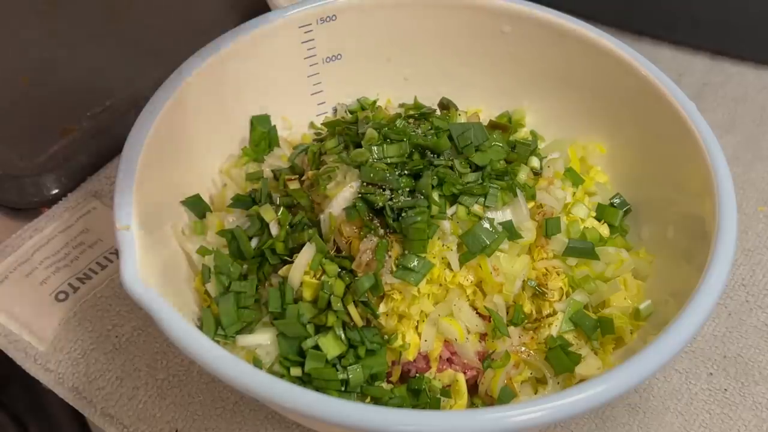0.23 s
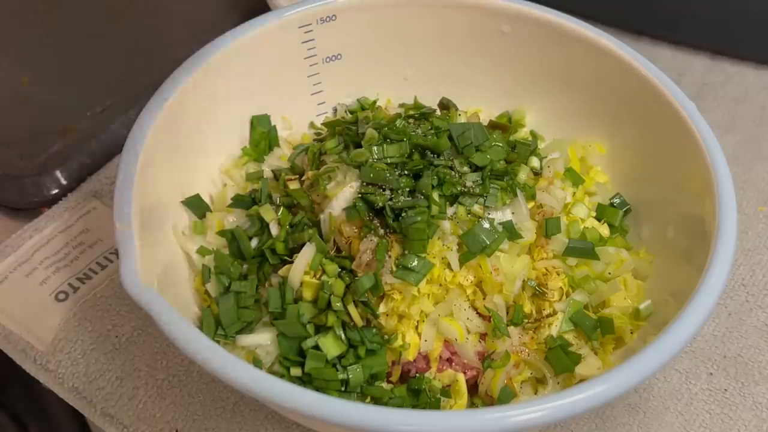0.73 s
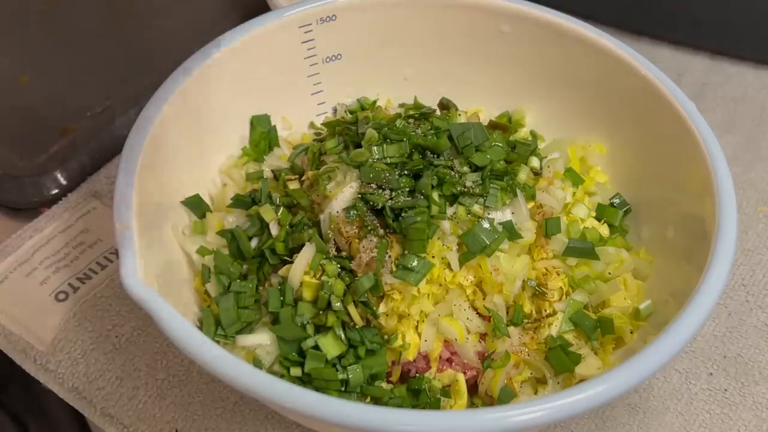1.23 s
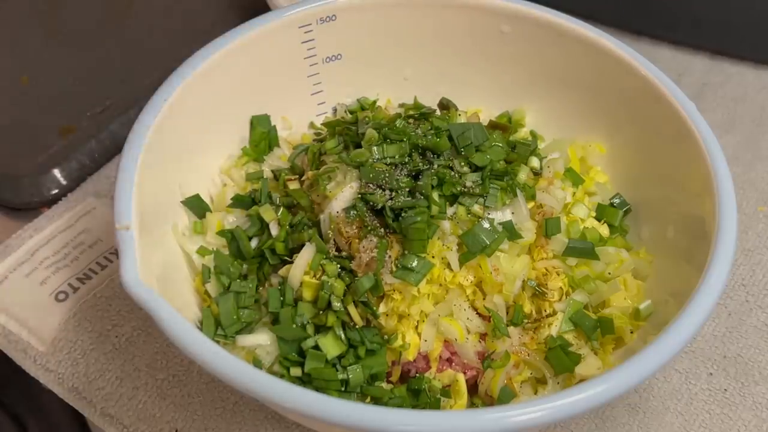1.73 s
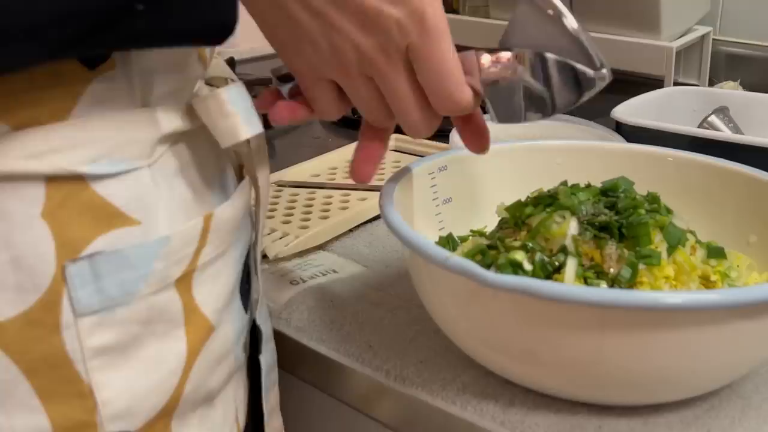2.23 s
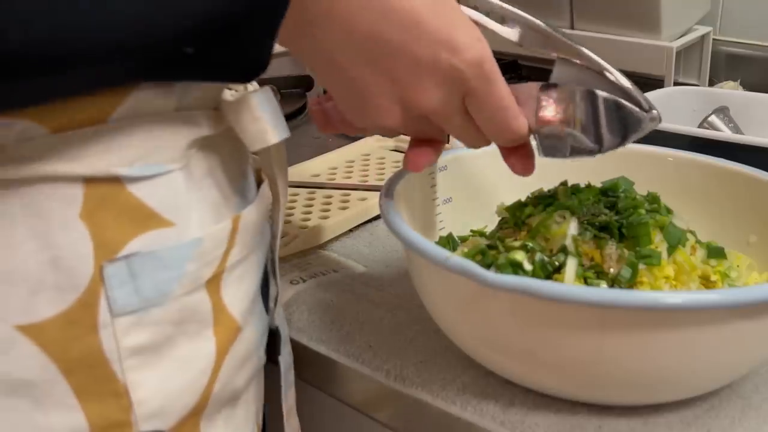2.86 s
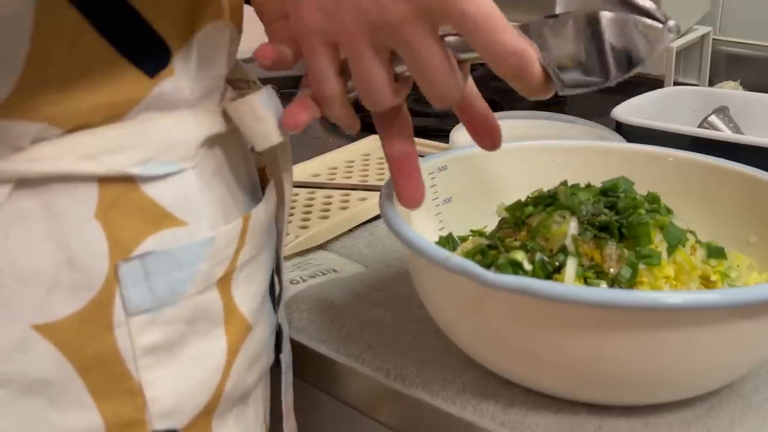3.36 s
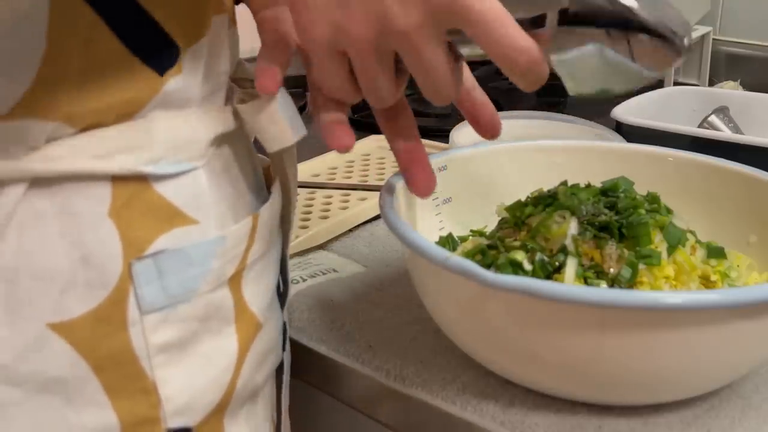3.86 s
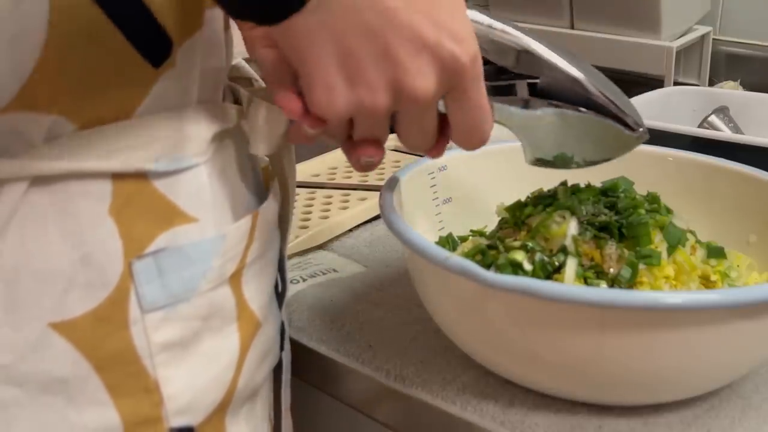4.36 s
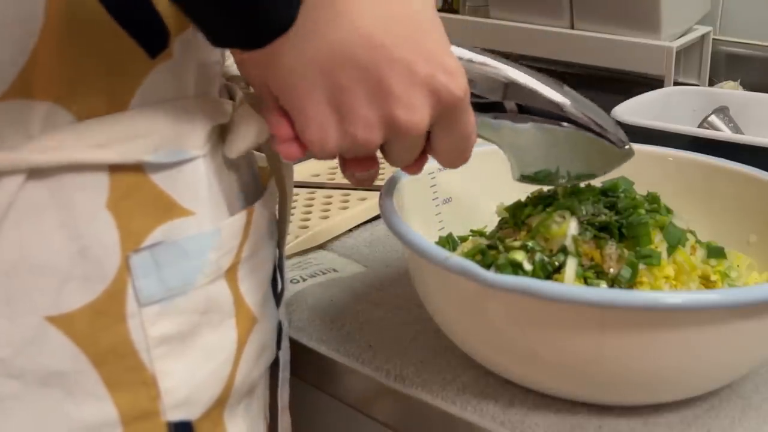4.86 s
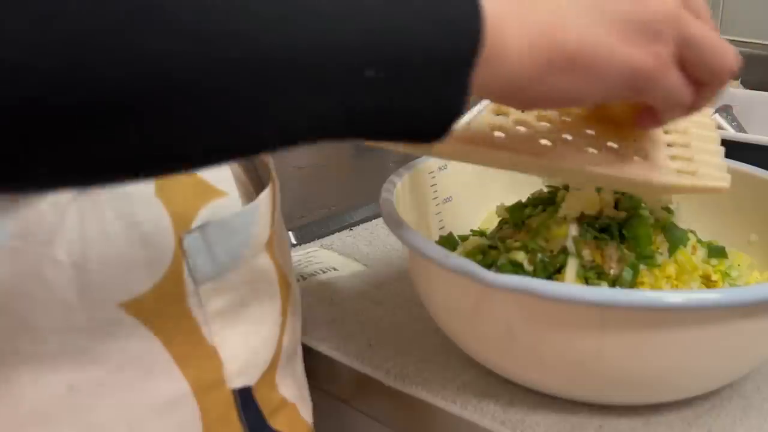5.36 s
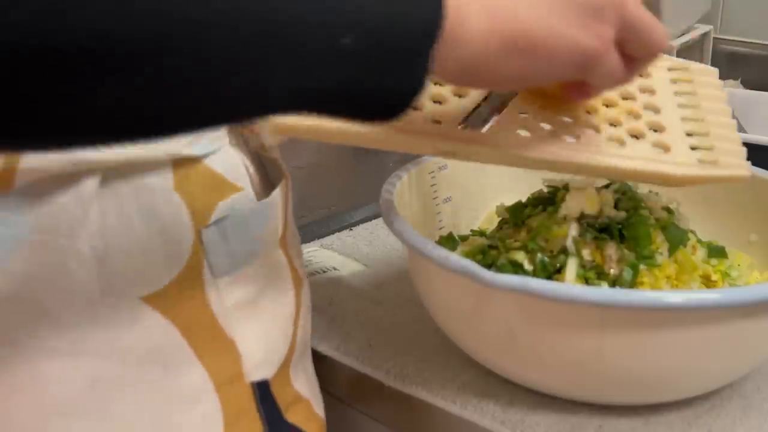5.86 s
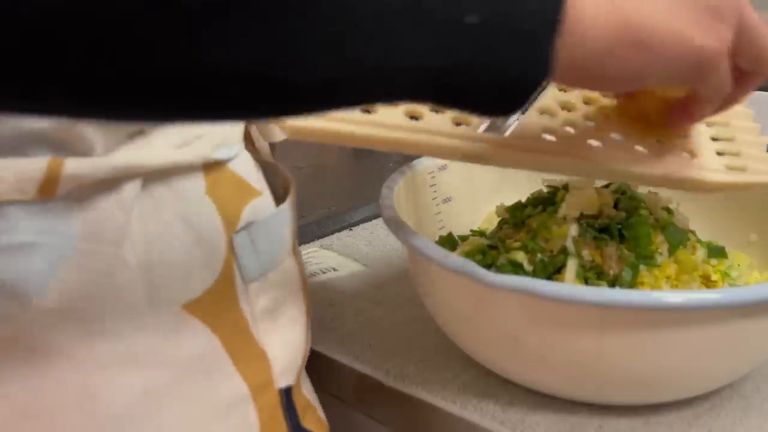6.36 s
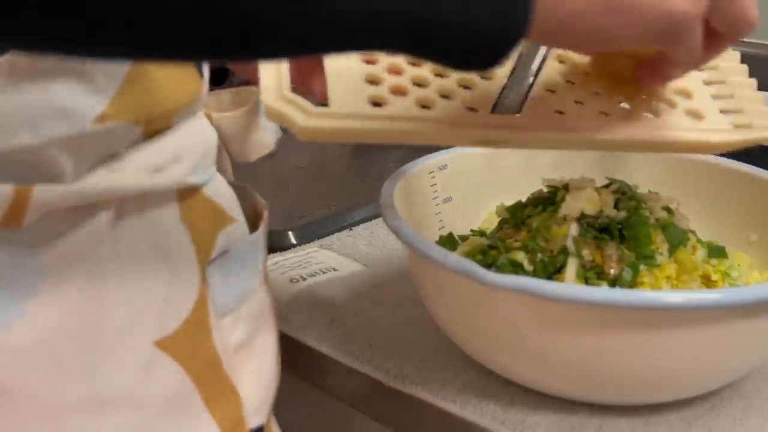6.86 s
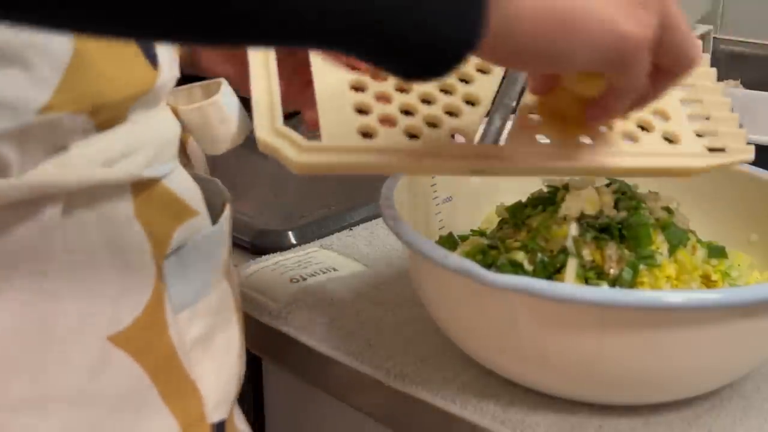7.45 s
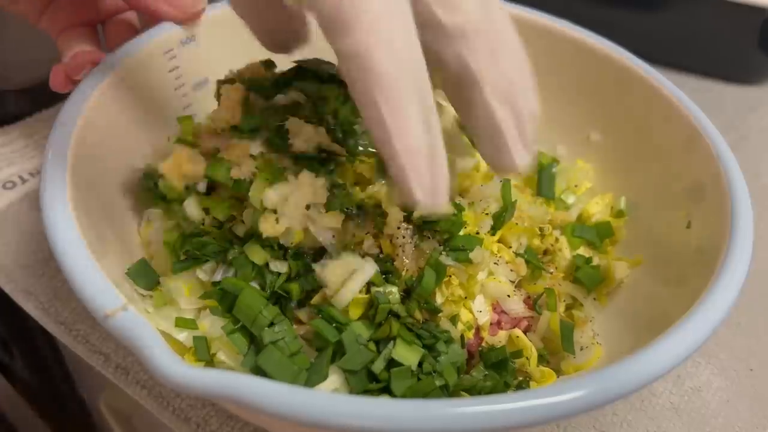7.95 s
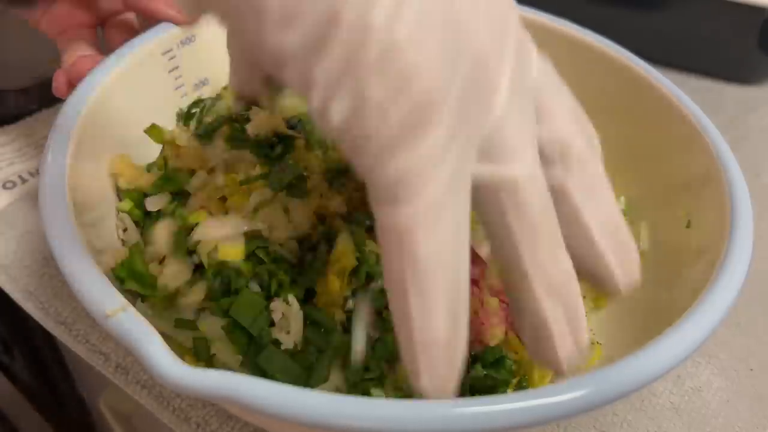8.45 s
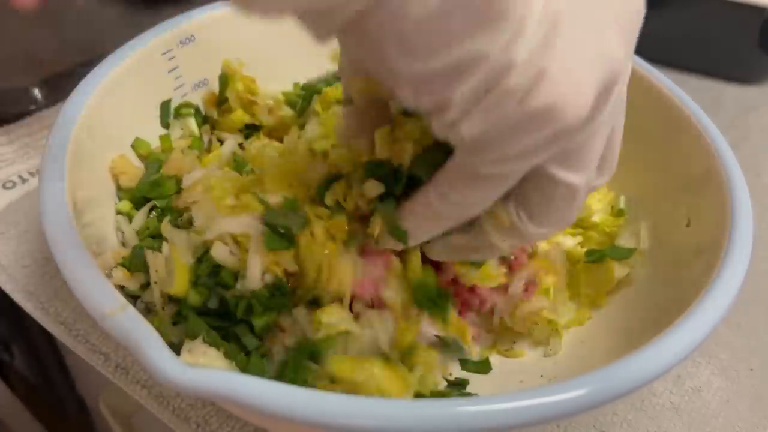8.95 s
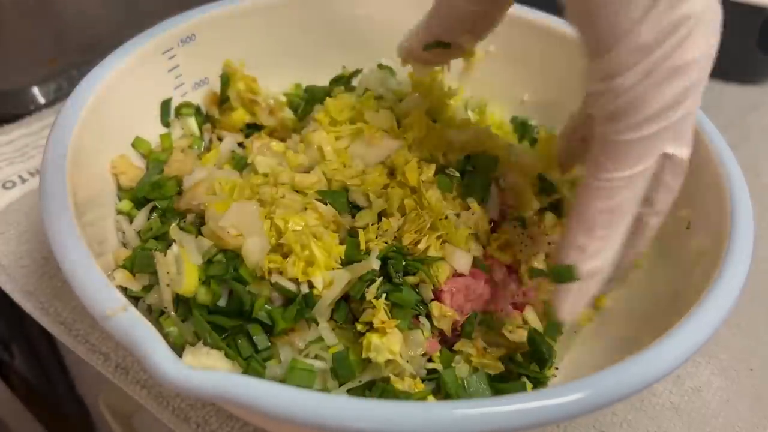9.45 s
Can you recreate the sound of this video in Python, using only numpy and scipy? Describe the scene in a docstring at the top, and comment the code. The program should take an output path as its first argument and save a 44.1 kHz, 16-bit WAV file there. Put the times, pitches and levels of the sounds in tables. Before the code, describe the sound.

Close up in a humming kitchen, a pepper mill crunches five times, a metal press squeezes juicily and snaps, ginger rasps on a grater, and gloved hands squelch.

```python
"""Close to a mixing bowl, a kitchen hums throughout: coloured noise plus narrow-band drone and whines.
First a pepper mill is twisted five times (grain noise, ringing ticks) and a sleeve rustles (soft grains);
then a steel garlic press is squeezed twice and snaps shut (grains driving resonators, struck modes).
Next ginger is rubbed to and fro on a plastic grater (grains under stroke envelopes), and a gloved hand
kneads wet filling (grains, chirps, pops). Dull worktop thuds (noise through modes) fall from the press on."""
import sys
import numpy as np
from scipy import signal
from scipy.fft import rfft, irfft, next_fast_len
from scipy.io import wavfile
from scipy.ndimage import uniform_filter1d

SR = 44100
rng = np.random.default_rng(int(sys.argv[2]) if len(sys.argv) > 2 else 0)


def file_out(sig):
    """Save sig as 16-bit WAV at sys.argv[1]."""
    # one column per channel
    cols = np.atleast_2d(sig).T
    # limit, then scale
    lim = np.clip(cols, -1, 1)
    pcm = np.round(lim * 32767).astype(np.int16)
    wavfile.write(sys.argv[1], SR, pcm)


N = 427769

# Kneading grip. Each row: time in seconds, relative glove level in dB, wet level over the glove in dB.
KNEADING = [(7.68, -71, 5), (7.7, -53.5, 3.5), (7.79, -50, -8), (7.85, -57.5, 1), (7.89, -66, 9.5),
            (8.06, -69.5, 15.5), (8.14, -44, -2), (8.15, -56.5, -1), (8.2, -48, 0.5), (8.35, -67, 5.5),
            (8.4, -77, 18), (8.51, -71, -1), (8.53, -57, 4.5), (8.84, -44.5, -3), (8.86, -53, -2),
            (8.99, -67, 7), (9.0, -61, -1), (9.02, -70.5, 8.5), (9.24, -61.5, 5.5), (9.36, -56, -33),
            (9.48, -52, -2), (9.56, -61.5, 2), (9.7, -68.5, 10.5)]
# Spectrum of dragged cloth and of scuffs. Each row: frequency in Hz, relative density in dB per Hz.
CLOTH = [(300, -0.5), (700, 0), (1200, 0.5), (2500, 2.5), (4500, -6), (8000, -8.5), (16000, -24)]


def undb(db):
    """Convert dB to gain."""
    return np.exp(np.asarray(db) * (np.log(10) / 20))


def level(x, db):
    """Scale to the given rms level in dB."""
    return x * undb(db) / np.sqrt(np.mean(x ** 2))


def curve(table, column):
    """Gain interpolated in dB from a table column, silent outside its times."""
    rows = np.array(table)
    return undb(np.interp(np.arange(N) / SR, rows[:, 0], rows[:, column], left=-200, right=-200))


def colour(x, spectrum, size=2048):
    """Minimum-phase filter with the given spectrum, from the folded cepstrum of its log gain."""
    hz, db = np.transpose(spectrum)
    bin_hz = np.maximum(np.arange(size // 2 + 1) * SR / size, 1)
    log_gain = np.interp(np.log(bin_hz), np.log(hz), db) * np.log(10) / 20
    cepstrum = irfft(log_gain)
    cepstrum[1:size // 2] *= 2
    cepstrum[size // 2 + 1:] = 0
    impulse = irfft(np.exp(rfft(cepstrum)))
    return signal.oaconvolve(x, impulse)[:N]


def ring(modes):
    """Impulse response of decaying modes, neighbours in opposite phase, peak 1."""
    t = np.arange(SR // 2) / SR
    h = np.zeros(len(t))
    for k, (hz, db, t60_s) in enumerate(modes):
        h += (-1) ** k * undb(db - 60 * t / t60_s) * np.sin(2 * np.pi * hz * t)
    return h / np.abs(h).max()


def walk(rate_hz):
    """Random levels drawn at the given rate, joined by straight lines; spread just under 1."""
    hold = int(SR / rate_hz)
    steps = np.repeat(rng.standard_normal(N // hold + 1), hold)
    return uniform_filter1d(steps, hold)[:N]


def grains(per_s, spread_db, smear_s, rub, patchy_db):
    """Tiny breakages, dB sizes exponentially spread and capped, each a noise burst, over a steady rub."""
    chance = rng.random(N) * SR / per_s
    hit_power = np.where(chance < 1, np.maximum(chance, .04) ** (-spread_db / 4.3), 0)
    burst = np.sqrt(signal.lfilter([1], [1, -np.exp(-1 / (smear_s * SR))], hit_power))
    noise = rng.standard_normal((2, N))
    mixed = level(burst * noise[0], 0) + rub * noise[1]
    return mixed * undb(patchy_db * walk(60))


def shimmer(x, modes, wander_db, rate_hz):
    """Drive each mode with a strength that wanders as the contact point moves; rms 1."""
    out = 0
    for k, (hz, db, t60_s) in enumerate(modes):
        radius = undb(-60 / (t60_s * SR))
        poles = [1, -2 * radius * np.cos(2 * np.pi * hz / SR), radius * radius]
        drive = x * undb(wander_db * walk(rate_hz))
        out = out + (-1) ** k * undb(db) * signal.lfilter([1, 0, -1], poles, drive)
    return level(out, 0)


def add(out, start_s, sound):
    """Mix a sound in at its start time."""
    i = int(start_s * SR)
    out[i:i + len(sound)] += sound[:N - i]


def ticks(table, t60_s, width, ping_db):
    """Sharp cracks: a damped noise burst with no bass, and a brief ping at its pitch."""
    out, t = np.zeros(N), np.arange(SR // 30) / SR
    for (start_s, db, hz), noise in zip(table, rng.standard_normal((len(table), len(t)))):
        burst = np.sign(noise) * undb(-60 * t / t60_s)
        crack = signal.lfilter(*signal.iirpeak(hz, 1 / width, SR), burst)
        # the ping falls 60 dB in 55 cycles
        ping = undb(ping_db - 60 * t * hz / 55) * np.sin(2 * np.pi * hz * t)
        both = crack / np.abs(crack).max() + ping
        bass_cut = signal.butter(2, 0.59 * hz, "highpass", fs=SR)
        add(out, start_s, undb(db) * signal.lfilter(*bass_cut, both))
    return out


def place(x, sides):
    """Two channels that differ in level and phase by frequency, as two microphones hear a source."""
    hz, db, lead_rad = np.transpose(sides)
    size = next_fast_len(N)
    f = np.arange(size // 2 + 1) * SR / size
    half = undb(np.interp(f, hz, db) / 2) * np.exp(.5j * np.interp(f, hz, lead_rad))
    return irfft(rfft(x, size) * np.array([half, 1 / half]), size)[:, :N]


def kitchen():
    """Broad appliance noise, quieter at first, with low drone and thin whines; bass alike left and right."""
    # Appliance noise spectrum. Each row: frequency in Hz, relative density in dB per Hz.
    air_spectrum = [(15, -52.5), (25, -24), (49, -1.5), (70, -2.5), (200, -17.5), (373, -23.5),
                    (476, -31.5), (545, -30.5), (695, -36.5), (1400, -44), (2840, -41), (3160, -42),
                    (3920, -47.5), (7710, -51.5), (16000, -68)]
    # Each row: time in seconds, air noise gain in dB, whine gain in dB.
    air_swell = [(0, -4.5, -16), (2.19, -2, -4), (2.21, -1.5, -1.5), (6.3, .6, 1.5), (7.5, 2, -2),
                 (9.7, 1, -7)]
    # Appliance drone swell. Each row: time in seconds, drone gain in dB.
    drone_swell = [(0, 0), (2.2, 0.5), (3.5, -1), (6.8, 0), (7.3, 4.5), (7.7, -2.5), (8.7, 3), (9.7, 0.5)]
    # Low drone bands. Each row: frequency in Hz, width in Hz, level before the swell in dB.
    drone_lines = [(41, 6.1, -58.5), (67, 3.2, -51.5), (96.1, 11, -53)]
    # Whine bands. Each row: frequency in Hz, width in Hz, level before the swell in dB.
    whine_lines = [(255.4, 11, -69.5), (372.2, 10, -64.5), (2147, 80, -72), (1883, 53, -77)]
    mid, side = (colour(rng.standard_normal(N), air_spectrum, size=8192) for _ in range(2))
    side_band = signal.butter(1, [350, 1800], "bandpass", fs=SR, output="sos")
    side = signal.sosfilt(side_band, side)
    out = level(mid + .8 * np.array([side, -side]), -49) * curve(air_swell, 1)
    for lines, swell in ((drone_lines, curve(drone_swell, 1)), (whine_lines, curve(air_swell, 2))):
        for hz, width_hz, db in lines:
            line = signal.lfilter(*signal.iirpeak(hz, hz / width_hz, SR), rng.standard_normal(N))
            out += level(line, db) * swell
    return out


def thuds():
    """Soft blows on the worktop: a rumbling push rings its low modes; a brighter slap fades over 1/3 s."""
    # Each row: start in seconds, relative level in dB, push t60 in seconds, slap gain in dB.
    blows = [(3.499, -25, 0.39, -22), (5.385, -40.5, 0.36, -45), (6.175, -34.5, 0.42, -43),
             (6.257, -30.5, 0.39, -45), (6.39, -40, 0.14, -45), (8.1, -43, 0.28, -45),
             (8.396, -29.5, 0.4, -45), (8.527, -35, 0.24, -45), (4.985, -43, 0.19, -45)]
    # Worktop modes. Each row: frequency in Hz, relative level in dB, t60 in seconds.
    worktop_modes = [(152, -7.5, 0.051), (262, -5, 0.07), (370, 1, 0.03), (485, -1, 0.022),
                     (610, -2.5, 0.024), (850, -5, 0.02), (1033, -9.5, 0.019), (1275, -17.5, 0.032),
                     (1680, -14, 0.011), (2300, -15, 0.012)]
    slap_hz, slap_t60_s = (1400, 4200), 0.32
    push_rise_s, slap_rise_s = 0.0035, 0.0065
    out, t = np.zeros(N), np.arange(SR // 2) / SR
    slap_band = signal.butter(2, slap_hz, "bandpass", fs=SR)
    for (start_s, db, t60_s, slap_db), noise in zip(blows, rng.standard_normal((len(blows), len(t)))):
        push = noise * (1 - np.exp(-t / push_rise_s)) * undb(-60 * t / t60_s)
        boom = signal.oaconvolve(push, ring(worktop_modes))[:len(t)]
        # longer pushes carry more energy
        add(out, start_s, level(boom, db - 23.5 + 10 * np.log10(t60_s / 0.23)))
        slap_decay = undb(db + slap_db - 60 * t / slap_t60_s)
        slap = signal.lfilter(*slap_band, noise * (1 - np.exp(-t / slap_rise_s)) * slap_decay)
        add(out, start_s, slap)
    return out


def sleeve():
    """Cloth drags softly as the mill is put aside."""
    # Each row: time in seconds, relative rustle level in dB.
    rustle = [(1.85, -63), (1.92, -60), (1.926, -55), (1.956, -54), (1.972, -45.5), (2.07, -66),
              (2.24, -52), (2.292, -55), (2.295, -55)]
    cloth = grains(490, 1.9, 0.0036, rub=0.85, patchy_db=-1.0)
    return level(colour(cloth, CLOTH), 1.2) * curve(rustle, 1)


def twisting():
    """Each twist bites at once, swells to its hardest point and dies into a trickle of crumbs."""
    # Each row: burrs bite in seconds, hardest point in seconds, hand stops in seconds,
    # relative level at the hardest in dB, at the stop in dB.
    twists = [(0.069, 0.159, .25, -31, -56), (0.455, 0.512, 0.6, -27, -53.5),
              (.86, 0.953, 1.037, -30, -53.5), (1.255, 1.324, 1.448, -33, -49.5),
              (1.624, 1.79, 1.998, -31.5, -53.5)]
    rise_s, crest_s, away_s = 0.034, 0.007, 0.0098
    bite_db, before_bite_db = -10.5, -35.5  # relative to the hardest grinding
    crumbs_at_start_db, trickle_db_per_s = -60, -72.5
    rows = []
    for bite_s, hardest_s, stop_s, db, stop_db in twists:
        rise_start_s = bite_s - rise_s
        if rows:
            # crumbs fall on until the next twist
            last_s, last_db = rows[-1]
            rows.append((rise_start_s, last_db + trickle_db_per_s * (rise_start_s - last_s)))
        else:
            rows += [(0, crumbs_at_start_db), (rise_start_s, db + before_bite_db)]
        rows += [(bite_s, db + bite_db), (hardest_s - crest_s, db), (hardest_s + crest_s, db)]
        rows.append((stop_s, stop_db))
    rows.append((stop_s + away_s, db + before_bite_db))
    return curve(rows, 1)


def mill():
    """Peppercorns crushed between the burrs: grit and cracking corns, then two ticks as it is put down."""
    # Grit spectrum. Each row: frequency in Hz, relative density in dB per Hz.
    spectrum = [(500, -25), (1000, -18.5), (1800, -5), (3500, -5.5), (5000, -9), (7500, -0.5), (9300, -2.5),
                (11000, -0.5), (13500, -3), (16000, -8.5)]
    # Cracking corns, then two ticks as the mill is put down.
    # Each row: start in seconds, relative level in dB, pitch in Hz.
    mill_ticks = [(0.0728, -5.5, 7200), (0.1296, -12, 3400), (0.1374, -8, 7300), (0.1494, -11, 7300),
                  (0.1574, -6.5, 7350), (0.1674, -14, 6600), (0.4578, -29, 7460), (0.4912, -15.5, 1800),
                  (0.5746, -18, 7660), (0.8613, -16, 6660), (0.9072, -28, 7650), (0.9644, -35, 6070),
                  (1.2555, -19, 6960), (1.3088, -28, 7460), (1.3414, -13, 8300), (1.6071, -29, 7900),
                  (1.6276, -18, 8800), (1.682, -28, 8470), (1.7624, -26, 8580), (1.8844, -22, 8580),
                  (1.9699, -27, 2200), (2.2074, -24, 11500)]
    grit = colour(grains(900, 4.17, 0.001, rub=0.91, patchy_db=2.0), spectrum)
    return level(grit, 2.13) * twisting() + undb(-7.5) * ticks(mill_ticks, 0.021, 2.4, ping_db=-6.0)


def press():
    """A clove bursts fibre by fibre and rings the steel cup; the handles clink, then snap together."""
    # One table per squeeze. Each row: time in seconds, relative crushing level in dB,
    # low ring over crushing in dB, cup ring over crushing in dB.
    squeezes = [
        [(2.29, -57, -10, -10), (2.326, -62.5, -26, -3), (2.452, -48.5, -3, 2), (2.486, -53, -15, -3),
         (2.492, -42.5, -25, -3), (2.578, -42, -37, 5), (2.702, -47, -28, 7), (2.714, -37, -36, 4),
         (2.926, -49, -29, 2), (3.02, -98, -11, 9)],
        [(4.19, -63, -12, -7), (4.194, -73, -18, -8), (4.314, -40.5, -30, 0), (4.44, -42, -9, -12),
         (4.512, -49.5, -13, -1), (4.568, -37.5, -3, -10), (4.724, -49.5, -4, -6), (4.796, -40.5, 4.5, -20),
         (4.916, -48, 16, -24), (4.962, -58.5, 15, -18), (4.978, -47.5, 8, -21), (5.066, -58.5, 15, -20),
         (5.13, -101, 24, -3)],
    ]
    # Fibre snaps, and small ticks and a clink as the press is handled.
    # Each row: start in seconds, relative level in dB, pitch in Hz.
    press_ticks = [(2.3511, -33, 4240), (2.4399, -27.5, 7300), (2.494, -15.5, 8750), (2.4979, -22, 8550),
                   (2.522, -20, 8550), (2.5504, -13, 9300), (2.5996, -13, 9000), (2.6107, -34, 3400),
                   (2.7158, -26, 3300), (2.7961, -28, 3540), (2.987, -41, 3470), (2.5396, -28, 4080),
                   (2.5816, -25, 4000), (2.643, -30, 4130), (2.829, -27, 5100), (3.3269, -57.5, 5450),
                   (3.2615, -45, 3130), (3.9875, -48.5, 3540), (4.2765, -34, 3350), (4.299, -31, 3420),
                   (4.3516, -28, 3440), (4.6977, -26, 2730), (4.7581, -26.5, 2770), (4.792, -23, 6350),
                   (4.837, -22, 2750), (4.9194, -31, 2410), (5.2797, -44, 8000)]
    # Press shifted in the hands. Each row: start in seconds, length in seconds, relative level in dB.
    scuffs = [(3.113, .11, -66.5), (3.328, 0.0067, -69), (3.593, .03, -62.5), (3.977, .03, -70.5),
              (4.086, 0.016, -65), (5.27, 0.022, -67), (5.38, .01, -76)]
    # Clove spectrum. Each row: frequency in Hz, relative density in dB per Hz.
    clove = [(900, -42), (1500, -14.5), (2600, 1), (3500, 3.5), (5500, 2), (7000, 4.5), (9000, 7.5),
             (11000, 4.5), (12500, 2), (14500, 7), (16000, -4)]
    # Modes of steel, its low part, cup, its high part, closing snap and handle clink.
    # Each row: frequency in Hz, relative level in dB, t60 in seconds.
    steel_modes = [(2890, 5.5, 0.008), (4050, 6, 0.011), (5130, -31, 0.012), (5900, -1.5, 0.049),
                   (6560, -3, 0.049), (7230, 4.5, 0.016)]
    low_modes = [(2297, 16, 0.024), (2400, -15, 0.015)]
    cup_modes = [(3447, 8, 0.031), (3040, 17, 0.0022), (3440, -11.5, 0.02)]
    high_modes = [(8270, -11, 0.06), (8760, 7.5, 0.024), (8900, -2.5, 0.029), (11570, 15.5, 0.012)]
    snap_modes = [(630, -6.5, 0.01), (1000, -0.5, 0.0057), (1390, 4.5, 0.0097), (1950, 4.5, 0.0048),
                  (3140, 0.5, 0.0016), (6400, -9.5, 0.0064)]
    clink_modes = [(1073, -3, 1), (2730, -11, 0.33), (3400, -6, 0.7)]
    scuff_rise_s, scuff_fall_s, scuff_depth_db = 0.028, 0.053, -12

    juice = grains(500, 1.9, 0.0013, rub=0.6, patchy_db=1.0)
    steel = undb(-5.5) * shimmer(juice, steel_modes, wander_db=4.0, rate_hz=30.)
    low = undb(-5.5) * shimmer(juice, low_modes, wander_db=1.5, rate_hz=30.)
    cup = undb(-4.2) * shimmer(juice, cup_modes, wander_db=3.2, rate_hz=30.)
    high = undb(-4.5) * shimmer(juice, high_modes, wander_db=5.0, rate_hz=30.)
    bursts = grains(78, 1.3, 0.00037, rub=0.05, patchy_db=4.5)
    crush = level(colour(juice + undb(-9.5) * bursts, clove), 4.24)
    rings = 0
    for q in squeezes:
        rings = rings + curve(q, 1) * (steel + high + low * curve(q, 2) + cup * curve(q, 3))
    # keep the rings free of low skirts
    out = signal.sosfilt(signal.butter(4, 1900., "highpass", fs=SR, output="sos"), rings)
    out += crush * sum(curve(q, 1) for q in squeezes)

    scuff = undb(-5.0) * crush + level(colour(juice, CLOTH), 3.8)
    for start_s, length_s, db in scuffs:
        end_s, edge_db = start_s + length_s, db + scuff_depth_db
        swell = [(start_s - scuff_rise_s, edge_db), (start_s, db), (end_s, db),
                 (end_s + scuff_fall_s, edge_db)]
        out += scuff * curve(swell, 1)
    out += undb(-5.5) * ticks(press_ticks, 0.011, 0.37, ping_db=2.5)

    knock = ring(snap_modes)
    rattle = rng.standard_normal(len(knock)) * undb(-60 * np.arange(len(knock)) / SR / 0.093)
    rattle = signal.oaconvolve(rattle, knock)[:len(knock)]
    add(out, 4.9827, undb(-16.5) * (knock + undb(-26.5) * rattle))
    add(out, 4.068, undb(-55.5) * ring(clink_modes))
    return out


def grater():
    """Strokes swell from the turn of the hand, run over the teeth, ring the plate and brake."""
    # Pulls and pushes alternate. Each row: start in seconds, relative peak level in dB.
    strokes = [(5.377, -39.5), (5.405, -35.5), (5.511, -35.5), (5.616, -35), (5.716, -34), (5.818, -35),
               (5.924, -35.5), (6.027, -37), (6.136, -36), (6.247, -36), (6.353, -37.5), (6.457, -36),
               (6.566, -35.5), (6.677, -35), (6.79, -36), (6.929, -38), (7.027, -36.5), (7.146, -36),
               (7.249, -35.5), (7.378, -32), (7.484, -33.5), (7.606, -35.5)]
    # The hand hesitates once. Each row: time in seconds, gain in dB.
    pause = [(6.84, 2.5), (6.89, -9), (6.93, -13), (6.96, 1.5)]
    # Rasp spectrum. Each row: frequency in Hz, relative density in dB per Hz.
    spectrum = [(300, -8.5), (800, -17.5), (1700, -8.5), (2400, -5), (4400, -3.5), (7000, -3.5),
                (9500, -2.5), (10800, 3.5), (12700, -1.5), (16000, -2.5)]
    # Plate modes. Each row: frequency in Hz, relative level in dB, t60 in seconds.
    plate_modes = [(556, -14.5, 0.015), (780, -9.5, 0.035), (1754, -14, 0.018), (2340, -13.5, 0.045),
                   (4370, 1, 0.0057), (5580, 5.5, 0.016), (7180, 1, 0.0096), (8370, 7, 0.018)]
    end_s = 7.674
    stroke_shares = np.array([0, 0.29, 0.74])  # turn, early, late
    pull_db, push_db = (-15.5, -3, -3.5), (-18.5, -7, -0.5)  # at those shares, re the peak

    start_s, peak_db = np.transpose(strokes)
    length_s = np.diff(np.append(start_s, end_s))
    time_s = start_s[:, None] + length_s[:, None] * stroke_shares
    db = peak_db[:, None] + np.array([pull_db, push_db])[np.arange(len(start_s)) % 2]
    db[0, 0] = peak_db[0]  # the root lands on the plate already moving
    rows = np.stack([time_s.ravel(), db.ravel()], axis=1)
    rows = np.vstack([rows, [end_s, peak_db[-1]]])  # the last stroke stops at its peak
    hesitation_db = np.interp(np.arange(N) / SR, *np.transpose(pause))
    rasp = grains(1500, 0.57, 0.00063, rub=1.0, patchy_db=2.0)
    plate = undb(-8.5) * shimmer(rasp, plate_modes, wander_db=2.5, rate_hz=22.)
    return (level(colour(rasp, spectrum), -1.2) + plate) * curve(rows, 1) * undb(hesitation_db)


def pockets(count, low_hz, high_hz, cycles, glide):
    """Air pockets that open in the wet filling: short chirps rising in pitch."""
    out = np.zeros(N)
    first_s = KNEADING[0][0]
    for when, pitch, size in rng.random((count, 3)):
        hz = low_hz * (high_hz / low_hz) ** pitch
        turns = np.arange(int(3 * cycles * SR / hz)) * hz / SR
        phase = 2 * np.pi * turns * (1 + glide * turns / cycles)
        chirp = np.exp(-turns / cycles * 4.5) * np.sin(phase)
        add(out, first_s + when * (N / SR - first_s), undb(11.0 * size) * chirp)
    return out


def hand():
    """The glove crinkles and drags; the wet filling squelches and pops. Returns two unlike sides."""
    # Glove and its fizz: spectra. Each row: frequency in Hz, relative density in dB per Hz.
    glove_spectrum = [(1200, -9.5), (2500, -2), (5000, -1), (8000, -2.5), (9500, 5), (11000, 12.5),
                      (16000, -7.5)]
    fizz_spectrum = [(7000, -2), (9000, 5.5), (11000, -10.5), (12200, -19), (16000, -6.5)]
    # Filling modes. Each row: frequency in Hz, relative level in dB, t60 in seconds.
    filling_modes = [(670, -7, 0.014), (1036, 1, 0.012), (1356, -2, 0.012), (1960, -3, 0.017),
                     (2630, -8.5, 0.017)]
    # Each row: start in seconds, relative level in dB, pitch in Hz.
    wet_pops = [(7.6985, -33, 2580), (7.816, -36, 1780), (7.837, -32, 2020), (8.1095, -36, 1870),
                (8.5285, -42, 1040), (8.693, -32, 1900), (8.7437, -26.5, 1780), (8.778, -26.5, 1350),
                (8.8038, -25, 6250), (8.819, -31, 1220), (8.9982, -44, 930), (9.2562, -40, 1040)]
    grip = curve(KNEADING, 1)
    firmness = grip / undb(-50)  # 1 at a firm grip
    sides = []
    for side_db in (1.4, -1.4):
        crinkle = grains(560, 1.4, 0.0011, rub=0.65, patchy_db=1.0)
        # the fizz grows faster than the grip
        fizz = level(colour(crinkle, fizz_spectrum), 3.0) * firmness ** 0.19
        glove = level(colour(crinkle, glove_spectrum), 2.3) + fizz
        squelch = grains(250, 3.5, 0.003, rub=1.0, patchy_db=-3.0)
        wet = undb(-4.5) * shimmer(squelch, filling_modes, wander_db=3.0, rate_hz=8.2)
        wet += level(pockets(count=500, low_hz=670.0, high_hz=2620.0, cycles=3.2, glide=0.062), -8.5)
        sides.append(undb(side_db) * grip * (glove + wet * curve(KNEADING, 2)))
    # strings of filling tear off the glove, however light the grip
    tears = level(colour(grains(41, 3.5, 0.00054, rub=0.3, patchy_db=3.0), glove_spectrum), -66.5)
    tears *= firmness ** .35
    shared = 0.1 * (sides[0] + sides[1])
    pops = ticks(wet_pops, 0.0088, 3.7, ping_db=-10.5)
    return 0.87 * (np.array(sides) + shared) + tears + pops


def scene():
    """Near sources and thuds, their short room tail, and the kitchen behind."""
    # Placing of mill, press and grater. Each row: frequency in Hz, left minus right in dB,
    # left lead in radians.
    mill_sides = [(500, -2, 0), (1000, 5.5, -.2), (1700, 0, -0.24), (3000, 0.5, 0.34), (5000, 0, -0.091)]
    press_sides = [(500, 0.82, 0), (1200, 1.3, -1.1), (2160, 0, 1), (3320, 0.066, 0.72), (4400, 0, 0.33),
                   (5200, 0, -0.04)]
    grater_sides = [(500, 0, -0.17), (2400, 0, 1), (4300, 0, 0.16), (5200, 0, 0.012)]
    # Unlike part of the tail. Each row: frequency in Hz, relative level in dB.
    room_side = [(100, -7.5), (500, 12.5), (1500, 9), (4000, -22), (8000, -24.5)]
    room_t60_s = .25
    near = place(mill() + sleeve(), mill_sides) + place(press(), press_sides)
    near = near + place(grater(), grater_sides) + hand()
    low = thuds()
    t = np.arange(SR // 3) / SR
    mid, side = rng.standard_normal((2, len(t))) * undb(-60 * t / room_t60_s)
    side = colour(side, room_side)[:len(t)]
    tail = (mid + 0.31 * np.array([side, -side])) / np.sqrt(np.sum(mid ** 2))
    wet = signal.oaconvolve(undb(-13) * near + undb(-9.5) * low, tail, axes=1)[:, :N]
    return near + low + wet + kitchen()


def record(dry):
    """Treble nears one signal in both channels, turned two full cycles against each other; the top is cut."""
    turn_from_hz, turn_to_hz, top_hz = 8450, 15500, 15950
    size = next_fast_len(N)
    hz = np.arange(size // 2 + 1) * SR / size
    left, right = rfft(dry, size)
    mid = (left + right) / 2
    side = (left - right) / 2 * np.interp(hz, [7600, turn_from_hz], [1, .25])
    turn_rad = np.interp(hz, [turn_from_hz, turn_to_hz], [0, 2 * np.pi])
    both = (mid + np.array([side, -side])) * np.exp(1j * np.array([-turn_rad, turn_rad]))
    top_cut = signal.ellip(10, .2, 80, top_hz, fs=SR, output="sos")
    return signal.sosfilt(top_cut, irfft(both, size)[:, :N])


dry = scene()
out = record(dry)
file_out(out)
```